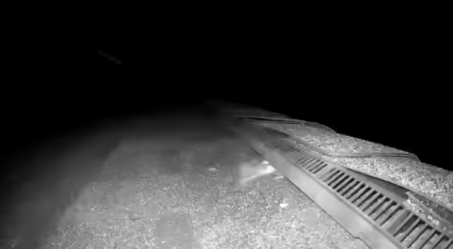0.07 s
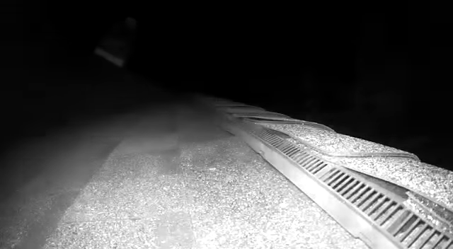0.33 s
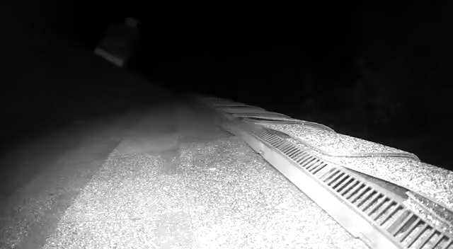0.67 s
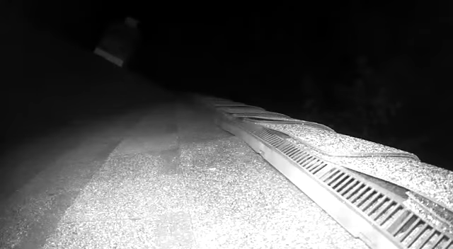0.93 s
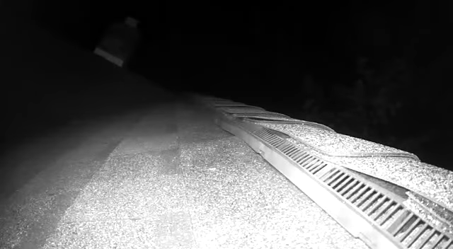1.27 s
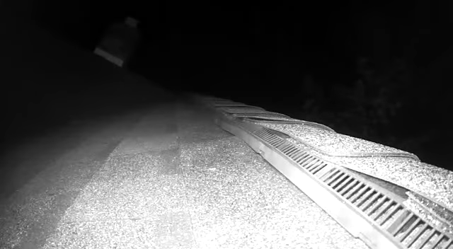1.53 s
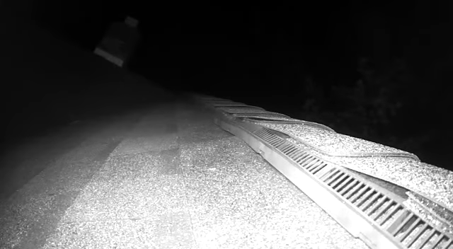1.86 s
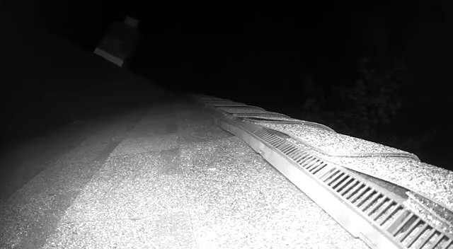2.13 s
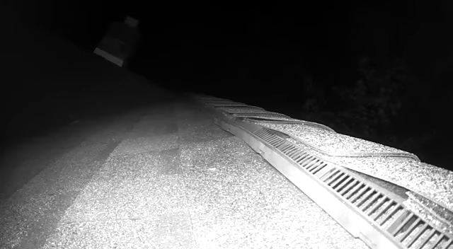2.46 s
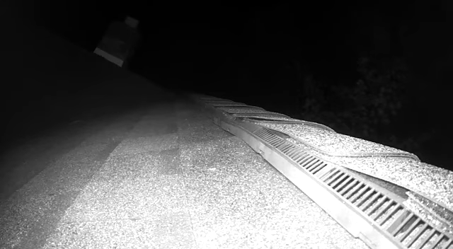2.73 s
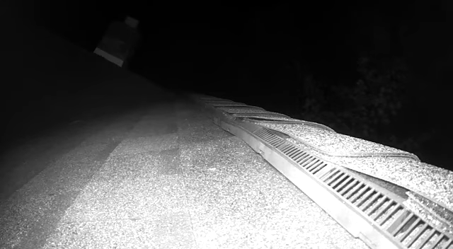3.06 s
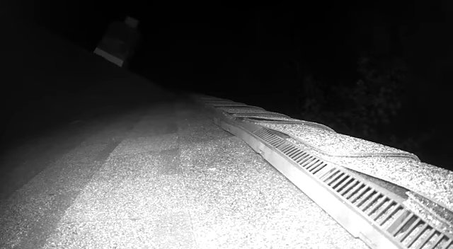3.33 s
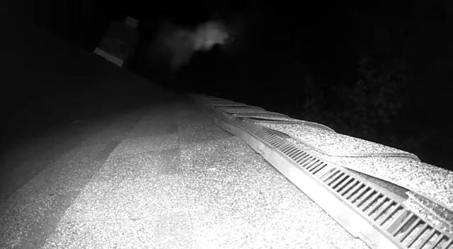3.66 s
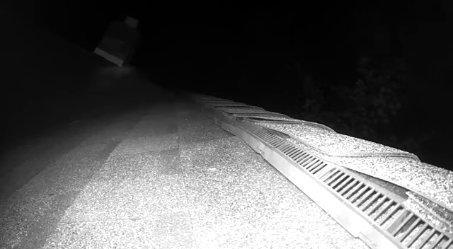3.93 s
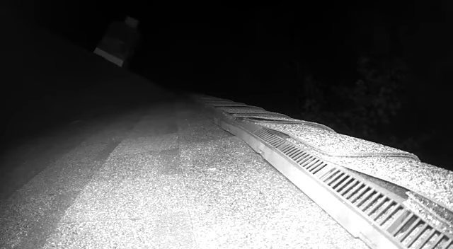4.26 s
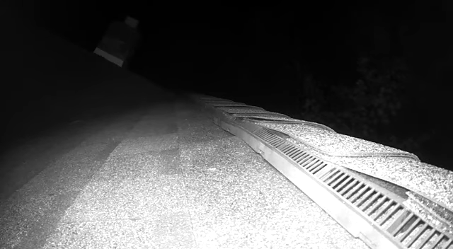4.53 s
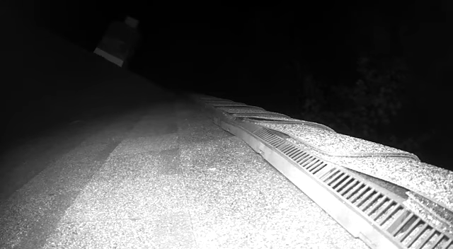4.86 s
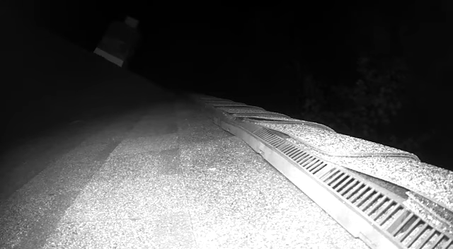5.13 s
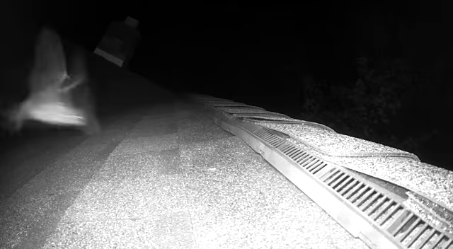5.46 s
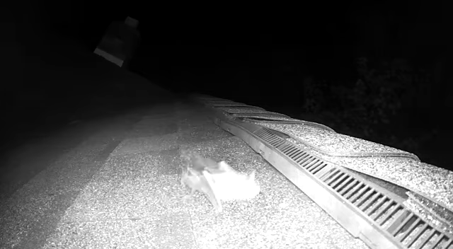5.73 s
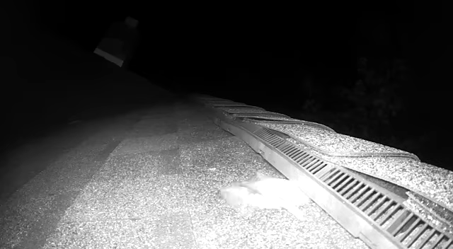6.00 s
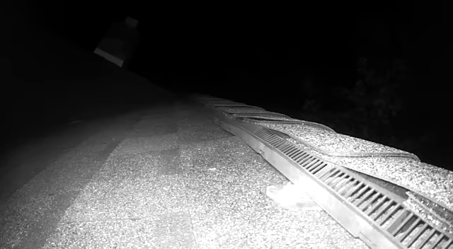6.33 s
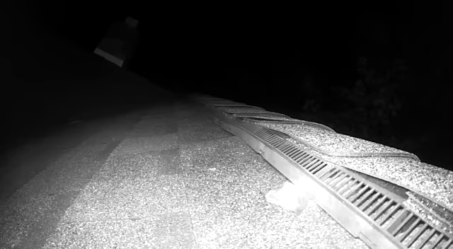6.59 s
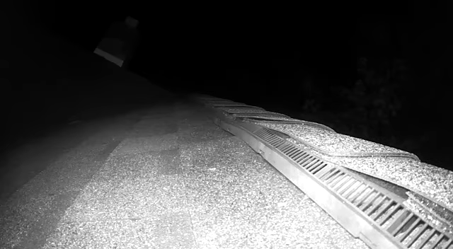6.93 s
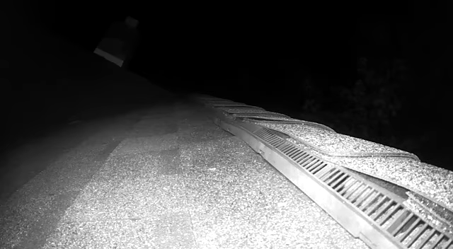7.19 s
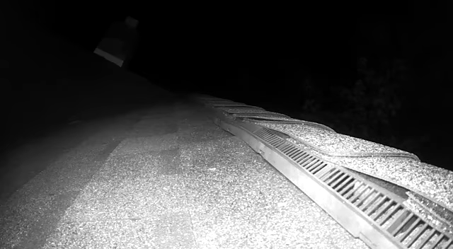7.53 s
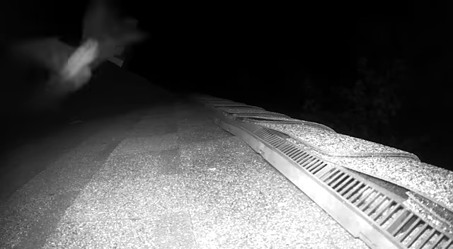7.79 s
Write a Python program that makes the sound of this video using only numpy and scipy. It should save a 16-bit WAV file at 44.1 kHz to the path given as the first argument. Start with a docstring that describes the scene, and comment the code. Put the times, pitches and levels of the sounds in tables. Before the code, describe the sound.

Low puffs of air from bat wings and tiny claws scrabbling on a gritty roof, over faint night hiss.

```python
"""Bats at a night camera

Bats fly close past a camera on a felt roof; the air from their wings buffets its microphone.
One lands and scrabbles to a vent, claws ticking on grit and knocking the roof; call trains buzz faintly.
Behind it: the hush of the night air, and the camera's own hiss and on-off electronic whine."""
import sys
import numpy as np
from scipy import signal
from scipy.fft import rfft, irfft, next_fast_len
from scipy.io import wavfile
from scipy.ndimage import uniform_filter1d, map_coordinates

SR = 44100
rng = np.random.default_rng(int(sys.argv[2]) if len(sys.argv) > 2 else 0)


def dump_mix(stems):
    """Bounce the given channels to the path in sys.argv[1] as a 16-bit WAV at rate SR."""
    frames = np.atleast_2d(stems).T  # one column per channel
    limited = np.clip(frames, -1, 1)  # hard clip at full scale
    pcm = np.round(limited * 32767).astype(np.int16)
    wavfile.write(sys.argv[1], SR, pcm)


N = 351477

# modes of the roof sheet: (frequency [Hz], gain [dB], t60 [s])
ROOF_MODES = [(395, -9.5, 0.017), (436, -0.5, .04), (520, 3.5, 0.032), (640, 0.5, 0.024),
              (775, -7.5, 0.027)]
# bright spectrum of a claw on grit: (frequency [Hz], gain [dB])
CLAW_SPECTRUM = [(800, -6), (2500, 0), (4000, 2.5), (5800, 0.5), (7400, 5.5), (8200, -3), (9000, -31)]


def amp(db):
    """Decibels to gain."""
    return 10 ** (np.asarray(db) / 20)


def unit(x):
    """x scaled to rms 1."""
    return x / np.sqrt(np.mean(x ** 2) + 1e-20)


def clock():
    """Time of every sample in seconds."""
    return np.arange(N) / SR


def curves(rows):
    """One automation curve for each column after the time."""
    times, *columns = np.transpose(rows)
    return [np.interp(clock(), times, column) for column in columns]


def gains(spectrum, hz):
    """Gain at hz, between (Hz, dB) points on a log axis."""
    point_hz, db = np.transpose(spectrum)
    return amp(np.interp(np.log(hz + 1), np.log(point_hz), db))


def filtered(x, response):
    """x through a filter given as a function of frequency."""
    size = next_fast_len(len(x) + SR // 8)
    return irfft(rfft(x, size) * response(np.fft.rfftfreq(size, 1 / SR)), size)[:len(x)]


def coloured(x, spectrum):
    """x through an EQ curve, at rms 1."""
    return unit(filtered(x, lambda hz: gains(spectrum, hz)))


def noise(spectrum):
    """Noise with the given spectrum, at rms 1."""
    return coloured(rng.standard_normal(N), spectrum)


def wobble(rate):
    """A smooth random curve, rate knots a second."""
    return map_coordinates(rng.standard_normal(int(N * rate / SR) + 4), [clock() * rate])


def bump(centre_s, width_s):
    """A bell-shaped envelope that peaks at 1."""
    return np.exp(-((clock() - centre_s) / width_s) ** 2)


def swells(rows, attack_s):
    """Power-summed envelope of events that each rise, hold and die away."""
    t = clock()
    each = [amp(db) * np.exp(np.minimum(t - s, 0) / attack_s - np.maximum(t - s - hold, 0) / release)
            for s, hold, db, release in rows]
    return np.linalg.norm(each, axis=0)


def ring(modes, t, scatter_db):
    """Struck modes die away, their balance and tuning a little different at every spot."""
    hz, db, t60 = np.transpose(modes)[:, :, None]
    balance, detune = rng.standard_normal((2, len(modes), 1))
    hz = hz * (1 + .025 * detune)
    return np.sum(amp(db + scatter_db * balance - 60 * t / t60) * np.sin(2 * np.pi * hz * t), axis=0)


def night_bed():
    """Distant air in the trees and the microphone's hiss."""
    # faders of the bed: (time [s], relative air level [dB], relative hiss level [dB])
    faders = [(.65, -60.5, -65), (3.25, -60, -65), (3.5, -57.5, -63), (4.44, -56, -61.5), (5.65, -56, -61),
              (6.2, -56, -57.5), (7.25, -57, -61), (7.97, -55, -60)]
    # dark air and bright hiss: (frequency [Hz], gain [dB])
    air_spectrum = [(20, -27.5), (60, 2.5), (130, 3), (250, 4.5), (450, 3.5), (900, 0), (1400, -7),
                    (2200, -15.5), (4000, -31.5), (9000, -48)]
    hiss_spectrum = [(100, -14), (1500, -2), (2800, 0), (4200, 1), (6500, -1.5), (7100, 1), (7500, -0.5),
                     (7900, -7), (8400, -10.5), (8900, -38)]
    air_db, hiss_db = curves(faders)
    air = amp(air_db + 2.0 + 0.3 * wobble(5)) * noise(air_spectrum)
    return air + amp(hiss_db + 2.5) * noise(hiss_spectrum)


def camera_whine():
    """The camera's electronics tick 200 times a second into a high resonance, in spells."""
    # spells of whine: (start [s], end [s], relative level [dB])
    spells = [(3.256, 3.87, -63.5), (4.29, 4.44, -61.5), (4.818, 4.878, -63), (5.273, 5.332, -66),
              (5.375, 5.436, -62.5), (5.826, 6.06, -67), (6.336, 6.46, -63.5), (7.378, 7.42, -61.5),
              (7.861, 7.91, -62)]
    # the resonance: (frequency [Hz], gain [dB])
    resonance = [(3000, -23), (5000, -19), (5800, -12.5), (6300, -20.5), (6700, -13), (7000, -8),
                 (7600, -1), (7800, -6), (8000, -7.5), (8200, -12), (8400, -14.5), (8800, -28.5)]
    t = clock()
    hz = 200 * np.arange(15, 45)[:, None]
    phases = 2 * np.pi * hz * t[:SR // 100] + .5 * rng.standard_normal(hz.shape)
    two_ticks = np.sum(gains(resonance, hz) * np.cos(phases), axis=0)
    drive = amp(-72.0) + sum(amp(db + 2.5) * (t > start) * (t < end) for start, end, db in spells)
    uneven = unit(amp(2.9 * wobble(200) + .8 * wobble(18)))  # no two ticks are equally strong
    return unit(np.resize(two_ticks, N)) * uneven * uniform_filter1d(drive, size=700)


def buzz(trains, spectrum, call_t60):
    """The audible edge of call trains: one short rasp of noise per call."""
    out = np.zeros(N)
    for rows in trains:
        rate, level_db = curves(rows)
        from_peak_s = np.abs(np.cumsum(rate) / SR % 1 - .5) / rate
        rasps = coloured(rng.standard_normal(N) * amp(-60 * from_peak_s / call_t60), spectrum)
        out += rasps * amp(level_db) * (clock() > rows[0][0]) * (clock() < rows[-1][0])
    return out


def bat_calls():
    """Fast calls blur into a faint buzz, first lower in tone, then higher."""
    # call trains, one list each: (time [s], call rate [1/s], level [dB])
    low_trains = [
        [(6.84, 180, -59), (6.88, 138, -54.5), (6.92, 140, -46.5), (6.95, 138, -57.5), (7.03, 150, -57.5),
         (7.12, 100, -69), (7.17, 130, -70)],
    ]
    high_trains = [
        [(7.555, 139, -65), (7.585, 142.3, -48), (7.63, 137, -54), (7.7, 130.7, -55.5), (7.79, 142, -57.5),
         (7.82, 132, -70)],
        [(7.89, 134.5, -54), (7.93, 137, -56.5), (7.97, 136, -62)],
    ]
    # colour of the calls: (frequency [Hz], gain [dB])
    low_spectrum = [(1000, 0), (3500, -22), (4800, -5.5), (5700, 6.5), (6600, -3), (7300, -8.5),
                    (8200, -30.5)]
    high_spectrum = [(700, -4.5), (1800, 0), (3200, -3.5), (5000, -4), (6500, -0.5), (7400, 4),
                     (8500, -20.5)]
    low = buzz(low_trains, low_spectrum, call_t60=0.0043)
    return low + buzz(high_trains, high_spectrum, call_t60=0.0029)


def wing_swishes():
    """Wing skin brushes the air once a beat."""
    # wingbeats on the approach: (time [s], level [dB])
    beats = [(5.01, -58), (5.29, -59.5), (5.41, -60.5), (5.50, -61.5)]
    envelope = sum(amp(db) * bump(s, width_s=0.017) for s, db in beats)
    return envelope * noise([(300, -8), (1000, -13), (2500, -2), (5500, -1), (7000, 2.5), (8500, -21)])


def claw_squeaks():
    """A sliding claw sticks and slips at a rough, high pitch for a moment."""
    # claw slides: (time [s], pitch [Hz], peak level [dB])
    slides = [(1.732, 5200, -53), (2.484, 4550, -54), (2.551, 4650, -54), (2.604, 5100, -64),
              (2.637, 4750, -58), (2.964, 4900, -52)]
    phase_jitter = 2 * np.pi * np.cumsum(220 * wobble(900)) / SR
    return sum(amp(db) * bump(s, width_s=0.0041) * np.sin(2 * np.pi * hz * clock() + phase_jitter)
               for s, hz, db in slides)


def scrabble():
    """Dense tiny slips on the mineral grit, which also set the roof sheet murmuring."""
    # claws and wing skin dragging: (start [s], hold [s], relative level [dB], release [s])
    scrapes = [(.35, 0.77, -70, .1), (1.3, 0.035, -62.5, .03), (2.31, .03, -65, .03),
               (2.92, 0.031, -65, 0.018), (5.68, 0.32, -63, 0.11), (6.07, 0.093, -57, .12),
               (6.58, 0.11, -62.5, 0.078), (6.645, .025, -57.5, .02), (6.87, .04, -55.5, 0.056),
               (7.0, 0.1, -59, 0.074), (7.59, .38, -67, .05)]
    drag = swells(scrapes, attack_s=0.024)
    slips_per_s = 1400
    slips = (rng.random(N) < slips_per_s / SR) * rng.standard_normal(N) * amp(4.4 * wobble(70))
    roof_response = ring(ROOF_MODES, np.arange(SR // 16) / SR, scatter_db=1)
    murmur = unit(signal.fftconvolve(slips, roof_response)[:N])
    body = coloured(slips, [(300, -18), (1200, 7.0), (2400, -10.5), (4000, -28.0), (8000, -34)])
    return drag * (amp(2.0) * coloured(slips, CLAW_SPECTRUM) + amp(-11.0) * murmur + amp(-7.5) * body)


def touches():
    """Each touch's mix: (time [s], thud [dB], knock [dB], knock pitch [Hz], tick [dB], tick pitch [Hz])."""
    # claws catching on grit: (time [s], level [dB], pitch [Hz])
    catches = [(0.4386, -39.5, 5700), (.4819, -50, 4500), (0.5063, -49, 5300), (.772, -52, 5000),
               (.7746, -44, 5100), (0.7828, -47, 5300), (0.8395, -47, 6180), (1.3052, -51, 4600),
               (1.6962, -52.5, 5300), (1.7279, -53, 5900), (2.3216, -54, 5600), (2.6008, -52.5, 5500),
               (2.764, -55, 6900), (2.814, -56, 6100), (2.9278, -50.5, 6500), (2.9583, -52, 4860),
               (5.6436, -39.5, 7600), (5.6558, -51, 7100), (5.6802, -46, 6100), (5.6961, -46, 5000),
               (5.7397, -50.5, 6200), (5.861, -49.5, 7100), (6.076, -44.5, 6700), (6.1532, -45.5, 7240),
               (6.2489, -50, 6000), (6.3522, -49, 7100), (6.599, -50.5, 4700), (6.6598, -50, 5100)]
    # wrists and thumbs knocking on the vent: (time [s], level [dB], pitch [Hz])
    blows = [(0.3362, -49.5, 1700), (0.4254, -47, 1310), (0.4818, -46, 2320), (0.6157, -53, 1300),
             (.7746, -55.5, 2900), (.8388, -55.5, 2450), (0.8855, -49, 1450), (1.0958, -54, 1400),
             (2.3926, -49.5, 1400), (3.3568, -53, 2200), (3.3688, -55.5, 2200), (5.6853, -37.5, 2740),
             (5.685, -33.5, 805), (6.2786, -46.5, 950), (6.3115, -27, 1540), (6.327, -48.5, 1150),
             (6.4465, -49.5, 1190), (6.5633, -39.5, 1220), (6.7941, -50, 1650), (6.887, -48, 1250),
             (6.912, -46.5, 1200), (7.035, -42, 1540), (7.5833, -46, 1550)]
    # feet and body dropping softly on the roof sheet: (time [s], level [dB])
    footfalls = [(0.7744, -52), (5.6743, -39), (5.685, -39.5), (6.0766, -41.5), (6.1125, -39.5),
                 (6.167, -38.5), (6.1931, -37), (6.2786, -39), (6.5637, -44.5), (6.5799, -41),
                 (6.7298, -45), (6.7494, -39), (7.0353, -46), (7.1542, -45), (7.5824, -43.5)]
    thud_max_db = -49.5  # the roof follows a knock only so far
    graze_max_db, graze_hz = -49, 5180  # a claw that only grazes
    ticks = [(s, db - 26, db - 14, 1900, db, hz) for s, db, hz in catches]
    knocks = [(s, min(db - 2, thud_max_db), db, hz, min(db - 11.5, graze_max_db), graze_hz)
              for s, db, hz in blows]
    steps = [(s, db, db - 13.5, 950, db - 13, graze_hz) for s, db in footfalls]
    return ticks + knocks + steps


def claw_tick(t, pitch_hz):
    """A claw catches, snags again about 2 ms later and rings briefly at its own pitch."""
    from_snag_s = np.abs(t - rng.uniform(0.002, 0.0026))
    catch = (1 - np.exp(-(t / .0008) ** 2)) * amp(-60 * t / 0.006)
    snag = 0.37 * amp(-60 * from_snag_s / 0.0023)
    tail = 0.054 * amp(-60 * t / 0.075)
    burst = coloured((catch + snag + tail) * rng.standard_normal(len(t)), CLAW_SPECTRUM)
    return filtered(burst, lambda hz: 1 + 1.3 / (1 + 1j * (hz - pitch_hz) / 450))


def roof_contacts():
    """At each touch a claw ticks, the surface knocks and the roof sheet thuds under it."""
    # short hard modes at the point of contact: (frequency [Hz], gain [dB], t60 [s])
    knock_modes = [(830, -1, 0.021), (1155, 5, 0.009), (1388, 7, 0.0099), (1560, 2, 0.013),
                   (1764, 2.5, 0.0089), (2195, 8, 0.0084), (2840, -0.5, 0.0049), (3660, 4.5, 0.01)]
    out, t = np.zeros(N + SR), np.arange(SR // 16) / SR
    levelled = lambda x: x / np.sqrt(np.sum(x ** 2) / (SR * .005))  # energy of 5 ms at rms 1
    onset = lambda rise_s: 1 - np.exp(-(t / rise_s) ** 2)  # skin and felt give way, softening the attack
    for s, thud_db, knock_db, knock_hz, tick_db, tick_hz in touches():
        thud = levelled(ring(ROOF_MODES, t, scatter_db=6.5) * onset(0.0016))
        # a blow favours the modes near its pitch
        struck = [(hz, db - 6 * np.log2(hz / knock_hz) ** 2, t60) for hz, db, t60 in knock_modes]
        knock = levelled(ring(struck, t, scatter_db=1.0) * onset(0.00045))
        tick = levelled(claw_tick(t, tick_hz))
        out[int(s * SR):][:len(t)] += amp(thud_db) * thud + amp(knock_db) * knock + amp(tick_db) * tick
    return out[:N]


def wing_air():
    """Broad and fine eddies roll over the microphone, with a push from each close wing stroke."""
    # gusts from bats flying close: (start [s], hold [s], level [dB], release [s])
    gusts = [(.31, 0.22, -29, .11), (2.73, 0.21, -39.5, 0.078), (3.19, 0.51, -38, .05),
             (3.31, 0.023, -29, .025), (3.365, 0.031, -21, 0.033), (3.75, 0.025, -28, 0.054),
             (3.9, .1, -28, 0.047), (4.06, 0.091, -35, 0.08), (5.46, .07, -50, 0.037),
             (5.77, 0.22, -35.5, 0.081), (6.95, 0.97, -50.5, .05), (7.9, .07, -42.5, .05)]
    # wing strokes whose air hits the microphone: (time [s], peak level [dB], pitch of the push [Hz])
    strokes = [(.337, -21, 114), (0.364, -25.5, 160), (.376, -17, 92), (.388, -23, 166), (0.421, -13, 64.4),
               (0.518, -19, 66.3), (0.706, -28.5, 59), (1.52, -41, 44.6), (2.0, -41.5, 55),
               (2.826, -33, 73.4), (2.937, -29.5, 77), (3.08, -36.5, 44.6), (3.325, -18, 60.5),
               (3.371, -13, 89), (3.394, -22, 67), (3.435, -27, 172), (3.756, -16.5, 83),
               (3.8, -30.5, 106.6), (3.913, -19.5, 89), (3.943, -18.5, 74.5), (3.985, -17.5, 73),
               (4.068, -34, 99), (4.134, -26.5, 64), (5.852, -22.5, 51), (5.951, -17, 75.7),
               (6.83, -33.5, 42.6), (7.165, -34, 44)]
    calm_broad_db, calm_fine_db = -58, -56  # floors between gusts
    flow = swells(gusts, attack_s=.017)
    breakup = amp(-15.5) * (flow / amp(-15.5)) ** 1.7  # fine eddies grow faster than the flow
    wakes = sum(amp(db - 17.5) * bump(s, width_s=0.014) for s, db, _ in strokes)  # shed by each stroke
    broad = noise([(10, -8.5), (28, 2.5), (65, 2.5), (100, -2), (150, -21.5), (260, -38.5),
                   (500, -60.0), (1200, -120)])
    broad /= np.sqrt(np.abs(uniform_filter1d(broad ** 2, size=1800)) + 0.15)  # evens out the eddies
    fine = noise([(60, -24.5), (120, 0), (200, -3.5), (320, -8.5), (500, -17), (900, -33),
                  (2500, -59.0), (5000, -120)])
    fine_level = amp(-4.0) * np.sqrt(breakup ** 2 + wakes ** 2 + amp(calm_fine_db) ** 2)
    rumble = np.hypot(flow, amp(calm_broad_db)) * amp(2.6 * wobble(16)) * broad
    flutter = fine_level * unit(fine * amp(4.2 * wobble(45)))
    air = rumble + flutter
    for (s, db, hz), angle in zip(strokes, rng.uniform(0, 2 * np.pi, len(strokes))):
        # a passing vortex pushes the eddies aside: one swing of pressure, shaped by its angle
        vortex = 1 / (1 - 1j * np.pi * hz * (clock() - s))
        push = amp(db) * np.real(np.exp(1j * angle) * vortex ** 3)
        air = air * (1 - np.abs(vortex) ** 2) + push
    return air


def scene():
    """Bats, camera and night air, mixed in mono at the microphone."""
    bats = bat_calls() + wing_air() + wing_swishes() + roof_contacts() + scrabble() + claw_squeaks()
    return (bats + camera_whine() + night_bed())[None]


def record(dry):
    """The camera wakes a moment late and keeps nothing above its band limit."""
    wake_s, fade_s, band_limit_hz = .306, .003, 9040
    awake = np.clip((clock() - wake_s) / fade_s, 0, 1)
    return filtered(dry[0] * awake, lambda hz: hz < band_limit_hz)[None]


dry = scene()
out = record(dry)
dump_mix(out)
```